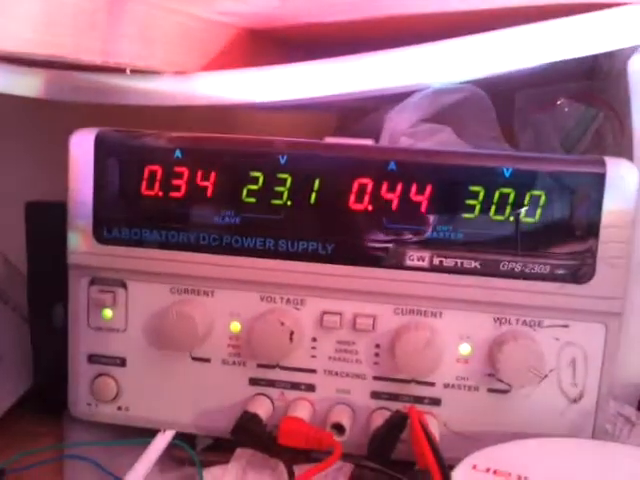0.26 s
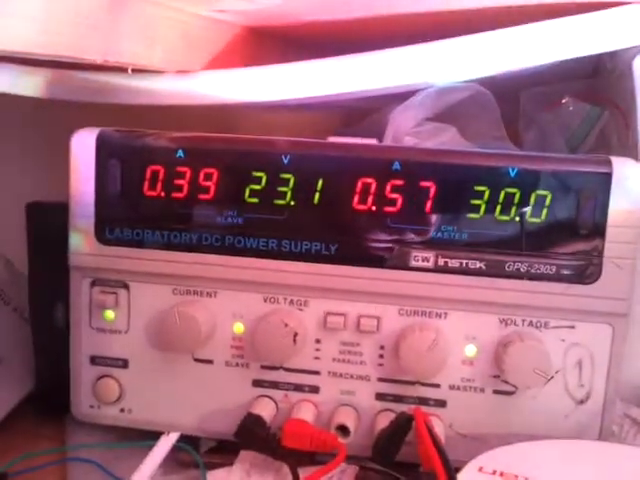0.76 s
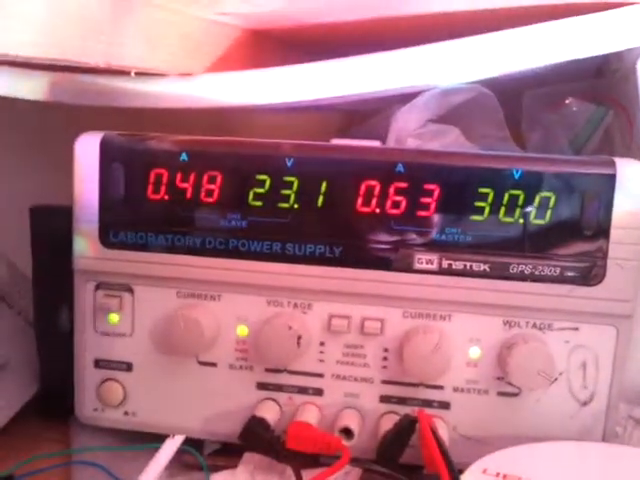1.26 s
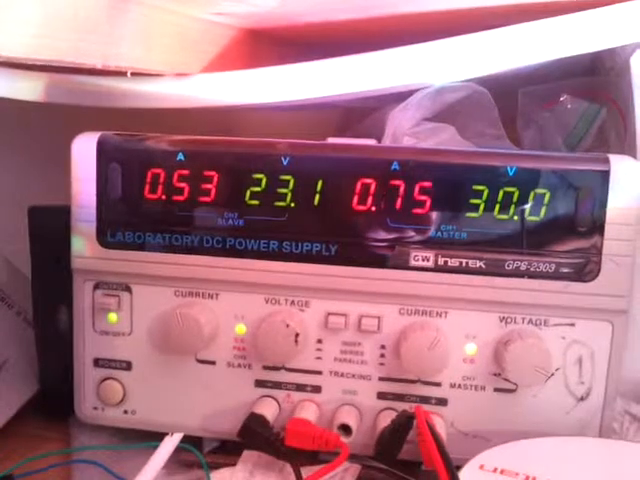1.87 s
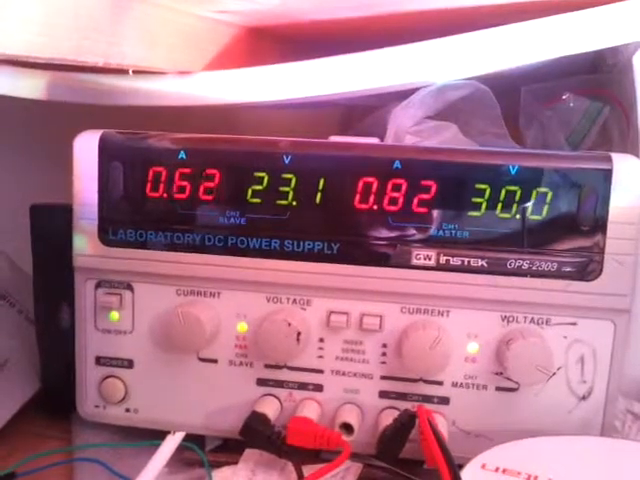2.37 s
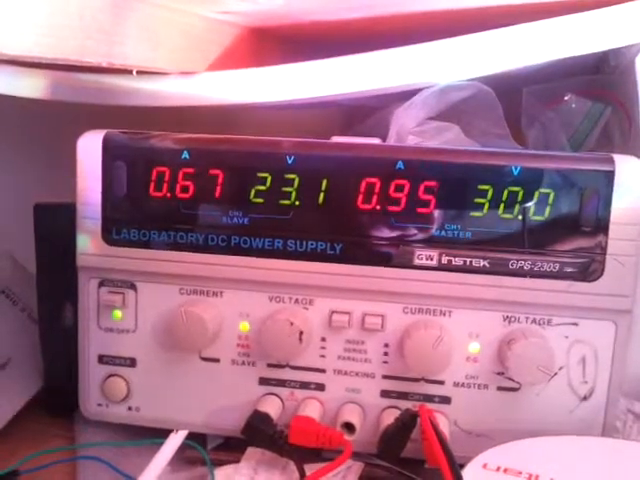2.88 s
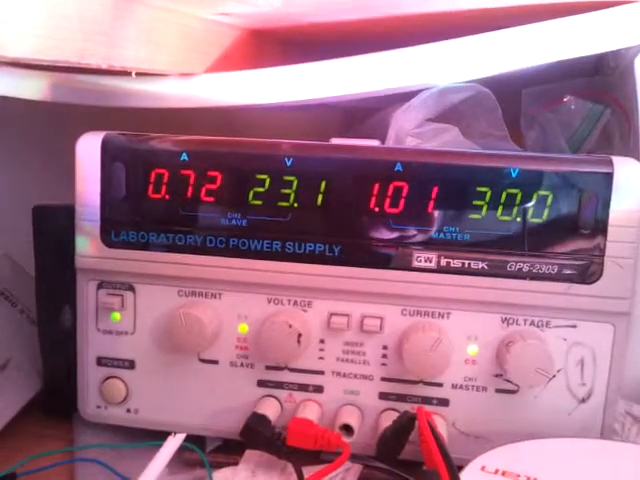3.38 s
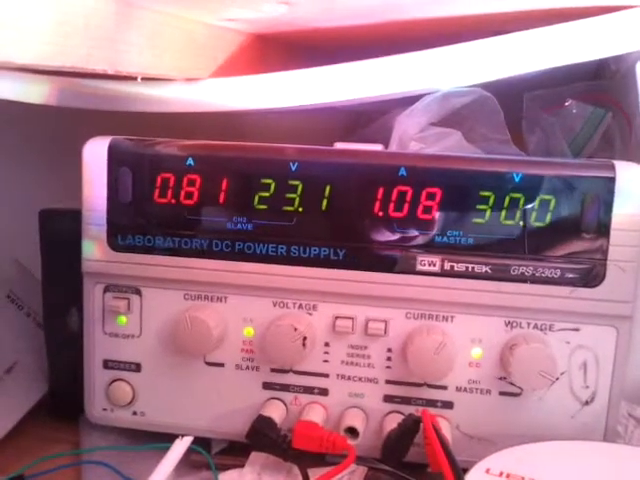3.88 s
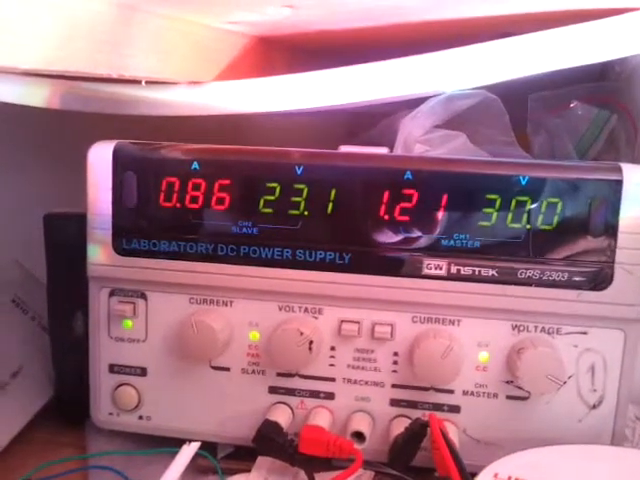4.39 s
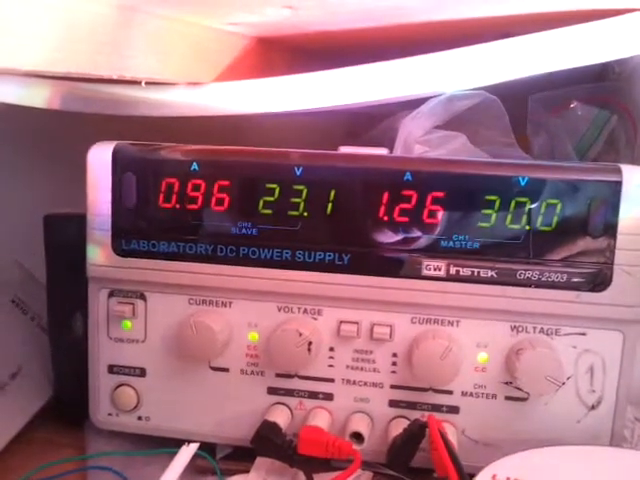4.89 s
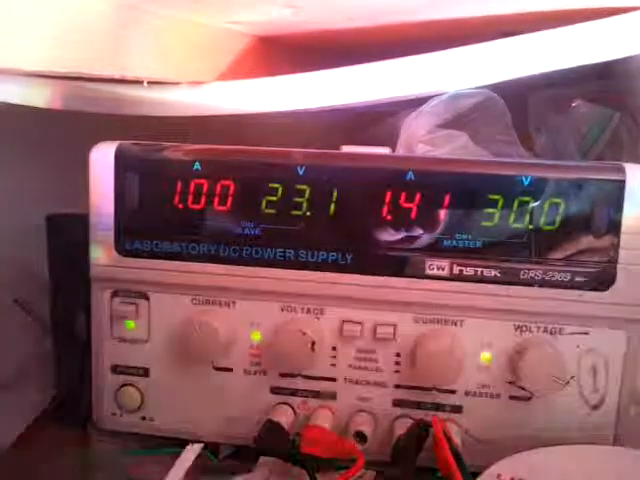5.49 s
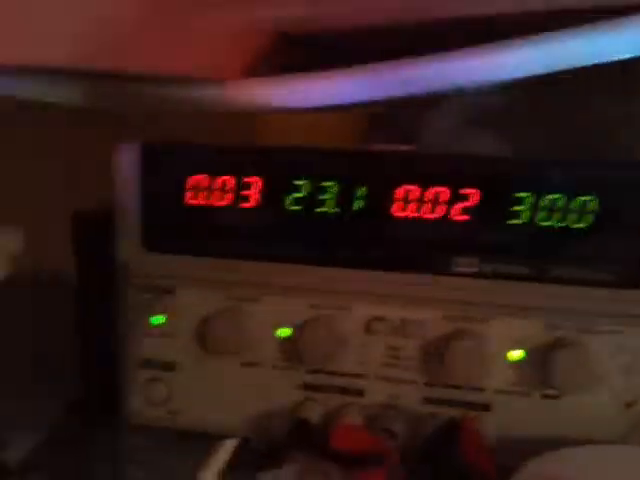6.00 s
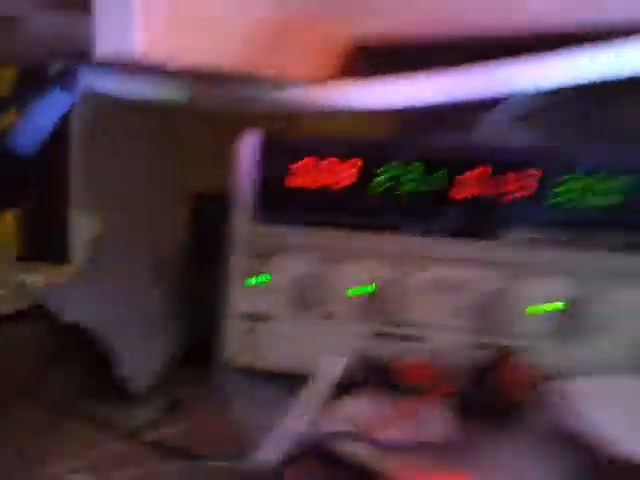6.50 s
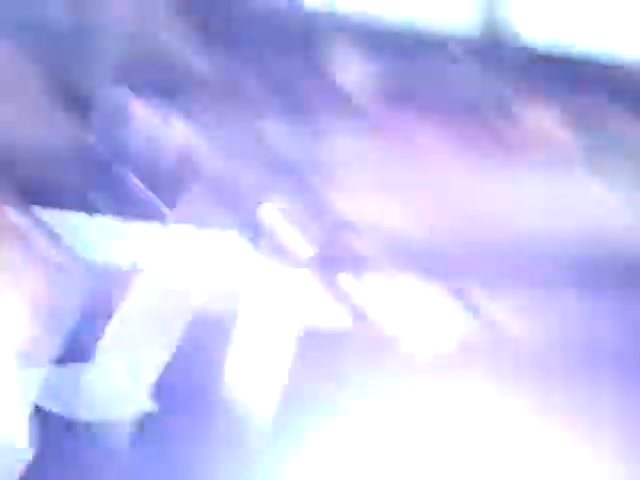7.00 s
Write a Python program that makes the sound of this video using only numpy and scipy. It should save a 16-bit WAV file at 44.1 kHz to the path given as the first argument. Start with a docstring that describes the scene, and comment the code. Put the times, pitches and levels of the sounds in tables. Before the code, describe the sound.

In an indoor workspace, a small fan in a bench power supply hums low and whirs steadily near a hand-held camera. Faint dry focus ticks patter in short, even runs under it. Near the end sharp plastic clicks sound from the camera case, the fan fades as the microphone swings away, and fingers knock and rumble against the case. Soft hiss stays throughout.

```python
"""Small fan and hand-held camera

A seven-blade bench-supply fan hums and whirs close by: tones locked to its shaft phase, plus shaped noise.
The camera's focus drive ticks faintly in short runs, each tick a filtered snap mixed with a tiny buzz.
Near the end the camera swings away, so the fan fades; fingers make the camera case click (struck resonances),
knock (decaying sines) and rumble (slow-gated noise). An even hiss lies under everything."""
import sys
import numpy as np
from scipy import signal
from scipy.fft import rfft, irfft
from scipy.io import wavfile

SR = 44100
rng = np.random.default_rng(int(sys.argv[2]) if len(sys.argv) > 2 else 0)


def transcribe(u):
    """Save the signal u as a 16-bit wav file named by the first command-line argument.

    u: samples, shape (n,) or (channels, n), limited to [-1, 1]; the rate is SR.
    q: integer samples, one column per channel.
    """
    v = np.clip(np.atleast_2d(u).T, -1, 1)
    q = np.round(v * 32767).astype(np.int16)
    wavfile.write(sys.argv[1], SR, q)


N = 319284
T = np.arange(N) / SR

# resonances of the plastic camera case: f/Hz, relative density/dB per Hz
CASE_SPECTRUM = [(500, -14.5), (1300, -4), (2300, -23), (3200, -4), (3800, -7), (4550, 0.5), (5400, -1.5),
                 (6500, -11), (7300, -25), (8200, -39.5)]

SWING_START_S, SWING_LENGTH_S = 6.625, 0.46
HUM_LOSS_DB, WHIR_LOSS_DB, RUSH_LOSS_DB = 12.5, 12, 7  # fade of each fan part over the swing


def undb(db):
    """Decibels to amplitude gain."""
    return 10 ** (np.asarray(db) / 20)


def curve(rows):
    """Rows (t/s, value) joined by straight lines."""
    return np.interp(T, *np.transpose(rows))


def colour(points, size):
    """Gain per FFT bin: dB straight over log frequency, falling 24 dB per octave outside the points."""
    hz, db = np.transpose(points)
    bins = np.maximum(np.fft.rfftfreq(size, 1 / SR), 1)
    octaves_outside = np.abs(np.log2(bins / np.clip(bins, hz[0], hz[-1])))
    return undb(np.interp(np.log(bins), np.log(hz), db) - 24 * octaves_outside)


def noise(points):
    """Gaussian noise of the given spectrum, rms 1."""
    x = irfft(rfft(rng.standard_normal(N)) * colour(points, N), N)
    return x / x.std()


def walk(rate_hz):
    """Smooth random drift: noise under a Gaussian low-pass, standard deviation 1."""
    lowpass = np.exp(-(np.fft.rfftfreq(N, 1 / SR) / rate_hz) ** 2)
    x = irfft(rfft(rng.standard_normal(N)) * lowpass, N)
    return x / x.std()


def decay(t, t60_s):
    """Exponential decay by 60 dB in t60_s."""
    return np.exp(-np.log(1000) * t / t60_s)


def ring(points, size):
    """Minimum-phase impulse response of a spectrum: sharp front, quick decay."""
    cepstrum = irfft(np.log(colour(points, size)))
    fold = np.r_[1, np.full(size // 2 - 1, 2), 1, np.zeros(size // 2 - 1)]
    return irfft(np.exp(rfft(cepstrum * fold)))


def add(out, start_s, sound, peak_db):
    """Mix a short sound in at start_s, scaled to the given peak."""
    i = int(np.clip(start_s * SR, 0, N - 1))
    scaled = undb(peak_db) * sound / np.abs(sound).max()
    out[i:i + len(sound)] += scaled[:N - i]


def turned(loss_db):
    """Gain of a fan part as the microphone swings away from it; the loss in dB grows linearly."""
    return undb(-loss_db * np.clip((T - SWING_START_S) / SWING_LENGTH_S, 0, 1))


def background_hiss(level_db=-59.5):
    """Stationary shaped noise at a constant level."""
    # f/Hz, relative density/dB per Hz
    hiss_spectrum = [(30, 13), (300, 9.5), (1000, 3.5), (2000, -3.5), (3000, -5.5), (4000, -1.5),
                     (4700, 1.5), (5250, 2), (5550, -3.5), (6000, -5.5), (6800, -12), (7400, -19.5),
                     (7800, -37.5)]
    return undb(level_db) * noise(hiss_spectrum)


def finger_rumble(ragged_db=2.0):
    """Fingers shifting on the case: low noise with a ragged level."""
    # grip: t/s, rumble level/dB
    grip = [(0, -100), (6.9, -85.5), (6.97, -56), (7.0, -52), (7.06, -47.5), (7.1, -43.5), (7.17, -43.5),
            (7.2, -62), (7.24, -62)]
    # f/Hz, relative density/dB per Hz
    rumble_spectrum = [(15, -5), (33, 1), (55, -11), (80, -4.5), (120, -12.5), (200, -18), (500, -32.5)]
    return undb(curve(grip) + ragged_db * walk(40)) * noise(rumble_spectrum)


def skin_rustle(grain_db=4):
    """Skin sliding on the case: grainy noise coloured by the case resonances."""
    # slide: t/s, rustle level/dB
    slide = [(0, -100), (6.98, -85.5), (7.05, -84), (7.075, -53.5), (7.1, -83), (7.18, -80), (7.2, -60),
             (7.24, -71)]
    return undb(curve(slide) + grain_db * walk(300)) * noise(CASE_SPECTRUM)


def finger_knocks(slap_gain=0.41, slap_t60_s=0.015):
    """A soft knock excites one decaying sine mode, with a fingertip's dull slap as a noise burst."""
    # knocks: t/s, peak level/dB, mode f/Hz, mode t60/s
    knocks = [(7.083, -34.5, 467, 0.048), (7.086, -35, 590, 0.017), (7.198, -45, 1090, .04)]
    # fingertip slap: f/Hz, relative density/dB per Hz
    slap_spectrum = [(400, 1), (850, -10), (1400, 4), (2200, -6), (3300, -12)]
    out = np.zeros(N)
    t = T[:SR // 10]
    bursts = noise(slap_spectrum)[:len(knocks) * len(t)].reshape(-1, len(t))
    for (start_s, peak_db, hz, t60_s), burst in zip(knocks, bursts):
        mode = np.sin(2 * np.pi * hz * t) * decay(t, t60_s)
        slap = slap_gain * burst * decay(t, slap_t60_s)
        add(out, start_s, mode + slap, peak_db)
    return out


def case_clicks(slip_gap_s=.00041, first_force=0.24, last_force=0.48, tail_db=-23, tail_t60_s=0.012):
    """The case gives way under the fingers: three quick impulses and a gritty tail drive its resonances."""
    # clicks: t/s, peak level/dB
    clicks = [(6.4465, -23), (6.4595, -30), (6.4835, -39.5), (6.5165, -44.5), (6.5822, -44.5),
              (6.6058, -25), (6.6092, -40), (6.7897, -26.5), (6.8093, -44), (7.0240, -43.5),
              (7.0675, -28.5), (7.0755, -47), (7.0867, -33.5), (7.1683, -44), (7.1990, -45), (7.2090, -51)]
    out, size = np.zeros(N), 2048
    t = np.arange(size) / SR
    body = ring(CASE_SPECTRUM, size)
    for start_s, peak_db in clicks:
        grit = rng.standard_normal(size)
        force = undb(tail_db) * grit * decay(t, tail_t60_s)
        gaps_s = slip_gap_s * (1 + 0.16 * np.tanh(grit[:2]))  # uneven slips
        slips_s = np.r_[0, np.cumsum(gaps_s)]
        force[(slips_s * SR).astype(int)] += [first_force, 1, last_force]
        add(out, start_s, signal.fftconvolve(force, body)[:size], peak_db)
    return out


def lens_tick(buzz_hz, clean, buzz_s=0.0029, snap_s=0.000895, octave_db=-8, rasp=0.039):
    """One lens move: a dry snap with rasp rings the lens, crossfaded by clean (0-1) into a short buzz."""
    # lens resonances: f/Hz, relative density/dB per Hz
    lens_spectrum = [(2400, -20.5), (3200, -0.5), (4000, 2.5), (5100, 0.5), (5600, -0.5), (6400, -2),
                     (7100, -20.5), (7700, -28)]
    size = 256
    t = T[:size]
    gate = np.sin(np.pi * np.minimum(t / buzz_s, 1))
    force = rasp * gate * rng.standard_normal(size)
    force[int(snap_s * SR)] += 1
    snap = np.convolve(force, ring(lens_spectrum, size))[:size]
    octave = undb(octave_db) * np.sin(2 * np.pi * 2 * buzz_hz * t)
    buzz = gate * (np.sin(2 * np.pi * buzz_hz * t) + octave)
    clean = np.clip(clean, 0, 1)
    return .5 * clean * buzz + (1 - clean) * snap / np.abs(snap).max()


def focus_ticks(step_s=0.06682, step_hz=5030, swell_db=0.5, scatter_db=1.1, lag_s=.0005):
    """The lens hunts in evenly clocked steps, strongest in mid-run; larger moves close most runs."""
    # runs of small steps: first step t/s, last step t/s, mean peak level/dB, buzz share/0-1
    focus_runs = [(0.023, 0.8924, -41, 0.44), (1.026, 1.2931, -41, 0.25), (3.465, 3.9331, -41.5, 0),
                  (4.3006, 4.6353, -40.5, 0.5)]
    # larger moves: t/s, peak level/dB, buzz f/Hz, buzz share/0-1
    focus_jumps = [(0.9583, -34.5, 5020, .3), (1.3604, -40.5, 3400, 0.75), (1.4272, -40.5, 3400, 0.8),
                   (4.7016, -39.5, 3340, 0.4), (4.7345, -38.5, 3720, .05)]
    out = np.zeros(N)
    for first_s, last_s, run_db, clean in focus_runs:
        steps = int(round((last_s - first_s) / step_s)) + 1
        swell = swell_db * (np.sin(np.linspace(0, np.pi, steps)) - .5)
        step_dbs = run_db + swell + scatter_db * rng.standard_normal(steps)
        for k, peak_db in enumerate(step_dbs):
            add(out, first_s + k * step_s + lag_s, lens_tick(step_hz, clean), peak_db)
    for start_s, peak_db, buzz_hz, clean in focus_jumps:
        add(out, start_s + lag_s, lens_tick(buzz_hz, clean), peak_db)
    return out


def shaft_phase(wander_hz=.012):
    """Rotor angle in radians: the integral of the fan speed with a slight random wander."""
    # fan speed as its third blade harmonic, 21 times the shaft rate: t/s, f/Hz
    whine = [(0.0, 790.2), (0.08, 792.6), (0.84, 793.6), (5.56, 788.3), (6.26, 793.7), (7.0, 792)]
    shaft_hz = curve(whine) / 21 + wander_hz * walk(4.05)
    return 2 * np.pi * np.cumsum(shaft_hz) / SR


def fan_air(shaft, whir_db=-48.5, rush_db=-59, gust_db=0.47, eddy_db=0.34, throb=0.062):
    """Turbulence rings the case and rushes at blade tips and grille, throbbing slightly once a turn."""
    # air in the case, broad resonances: f/Hz, relative density/dB per Hz
    whir_spectrum = [(30, -25.5), (50, -23.5), (95, -13.5), (160, -14), (200, -6), (242, -7.5), (275, 2),
                     (330, -1), (352, -4), (402, -3), (460, -16), (600, -26), (900, -39.5)]
    # blade tips and grille: f/Hz, relative density/dB per Hz
    rush_spectrum = [(400, -14.5), (650, -7), (725, 0), (775, 0), (820, -7.5), (885, -9), (925, -2.5),
                     (1030, -16), (1230, -9), (1750, -15.5), (2250, -13), (2520, -18), (2700, -14.5),
                     (5000, -29)]
    whir = turned(WHIR_LOSS_DB) * undb(whir_db + gust_db * walk(8.8)) * noise(whir_spectrum)
    rush = turned(RUSH_LOSS_DB) * undb(rush_db + eddy_db * walk(15)) * noise(rush_spectrum)
    return (whir + rush) * (1 + throb * np.sin(shaft))


def fan_tones(shaft, hum_db=-44, flutter_db=0.81, flutter_hz=10, waver_db=0.75):
    """Seven blades chop the air into a fluttering hum; weaker rotor and case tones waver above it."""
    # weaker rotor tones: multiple of the shaft rate
    rotor_orders = [8, 21, 24, 33, 38, 42, 50]
    # their levels: rms level/dB
    rotor_dbs = [-61.5, -62, -70.5, -80.5, -84, -77, -85]
    # case and motor tones, independent of the shaft: f/Hz, rms level/dB
    case_tones = [(316.5, -58.5), (365.5, -62.5), (5329, -83), (5593, -84)]
    hum = undb(hum_db + flutter_db * walk(flutter_hz)) * np.sin(7 * shaft)
    partials = [(order * shaft, db) for order, db in zip(rotor_orders, rotor_dbs)]
    for hz, db in case_tones:
        partials.append((2 * np.pi * np.cumsum(hz + .8 * walk(3)) / SR, db))
    upper = np.zeros(N)
    for phase, db in partials:
        start_phase = rng.uniform(0, 2 * np.pi)
        upper += undb(db + waver_db * walk(3.1)) * np.sin(phase + start_phase)
    # sqrt(2): rms level to sine peak
    return np.sqrt(2) * (turned(HUM_LOSS_DB) * hum + turned(RUSH_LOSS_DB) * upper)


def scene():
    """Hiss, handling, focus drive and fan, summed to one channel."""
    handling = finger_rumble() + skin_rustle() + finger_knocks() + case_clicks()
    shaft = shaft_phase()
    fan = fan_air(shaft) + fan_tones(shaft)
    return (background_hiss() + handling + focus_ticks() + fan)[None]


def record(dry):
    """The camera cuts off steeply above 7.7 kHz: an elliptic low-pass."""
    lowpass = signal.ellip(8, .2, 70, 7700, fs=SR, output="sos")  # ripple 0.2 dB, stopband -70 dB
    return signal.sosfilt(lowpass, dry)


dry = scene()
out = record(dry)
transcribe(out)
```